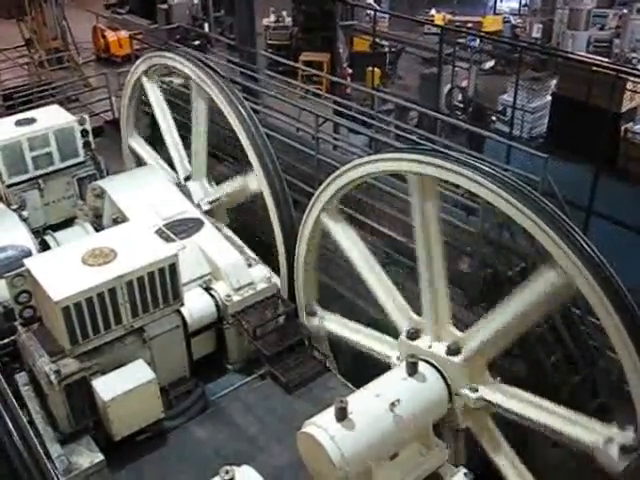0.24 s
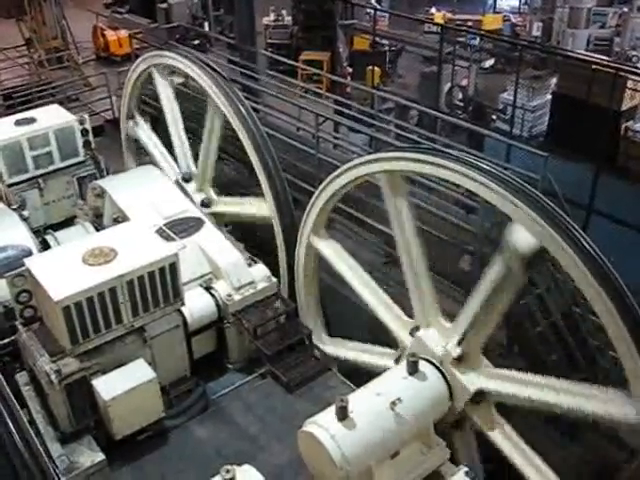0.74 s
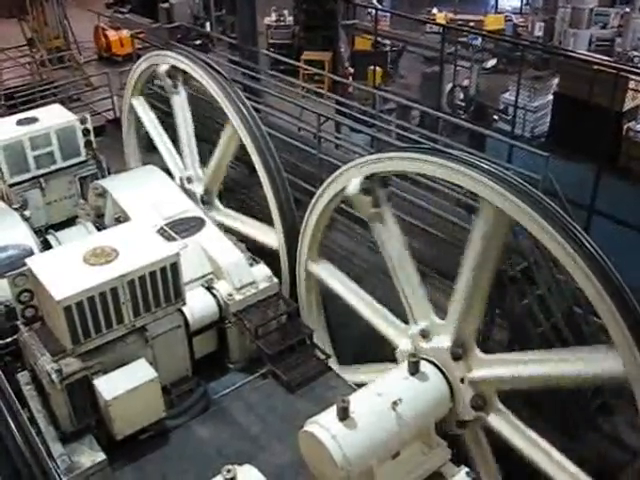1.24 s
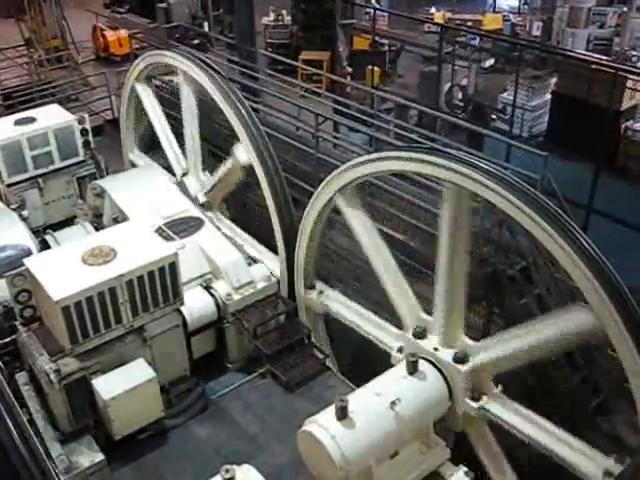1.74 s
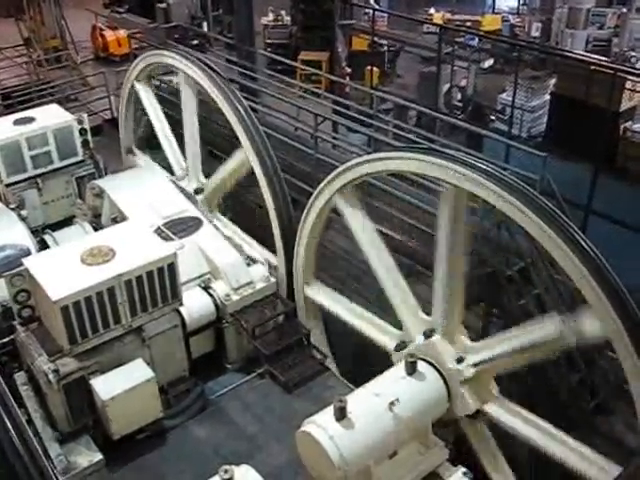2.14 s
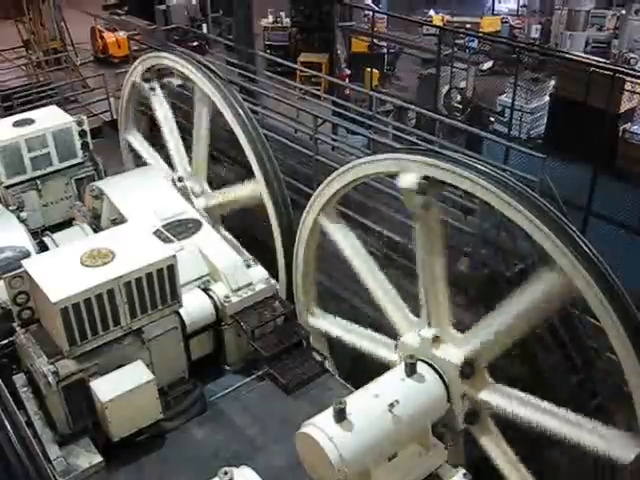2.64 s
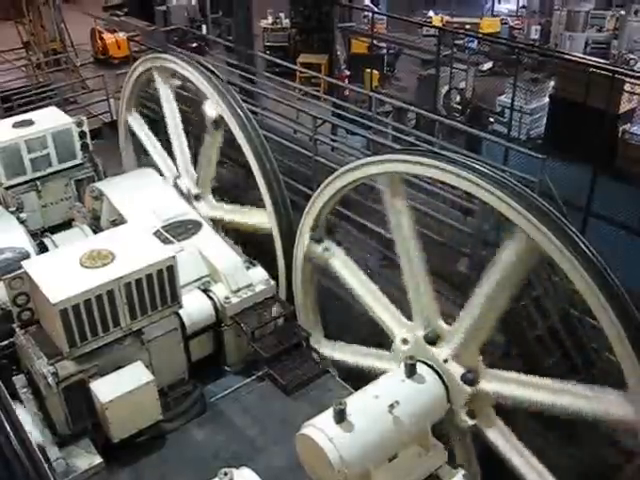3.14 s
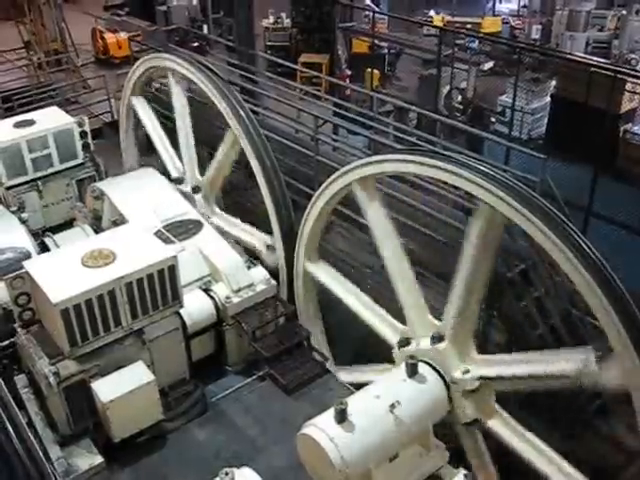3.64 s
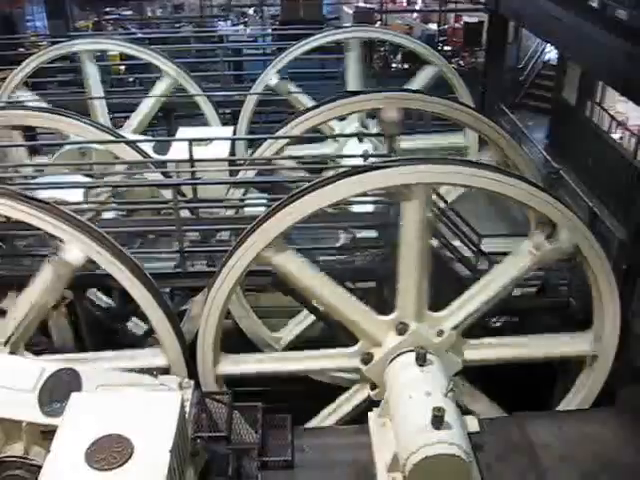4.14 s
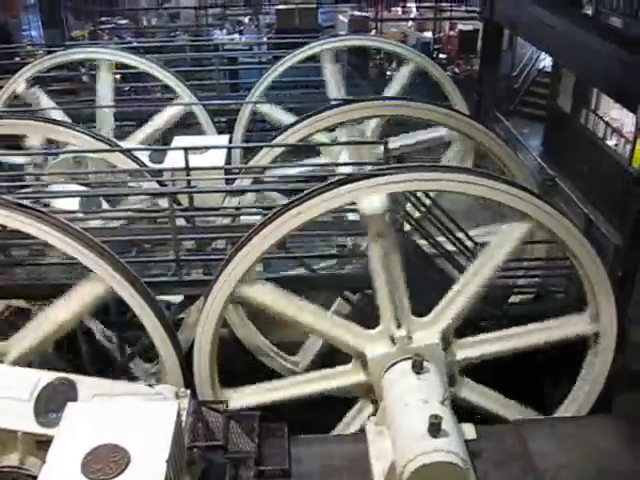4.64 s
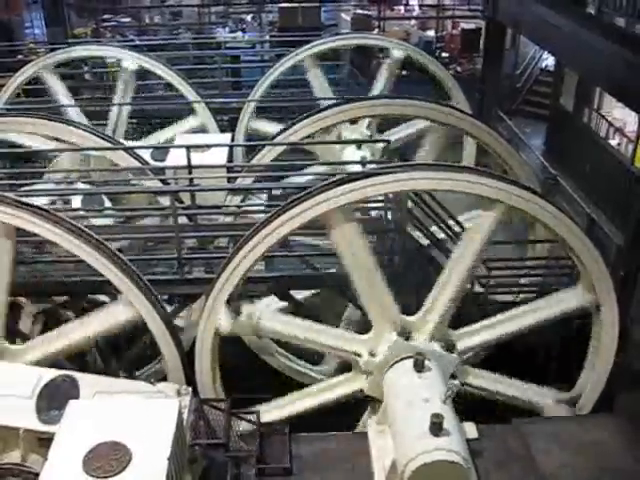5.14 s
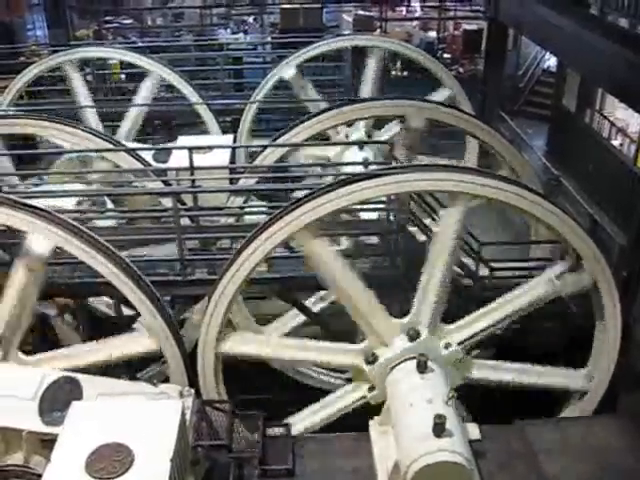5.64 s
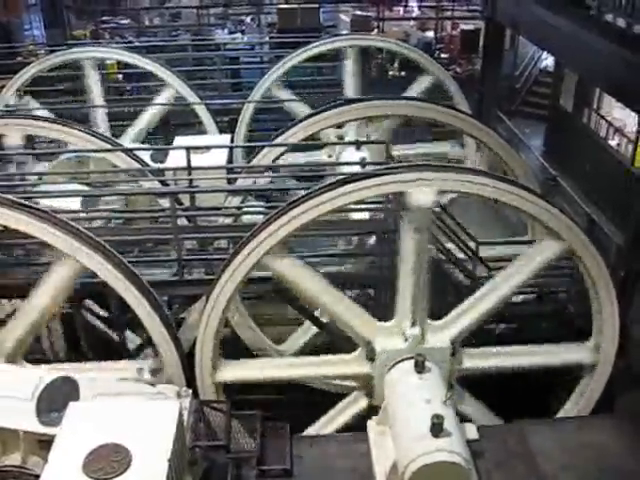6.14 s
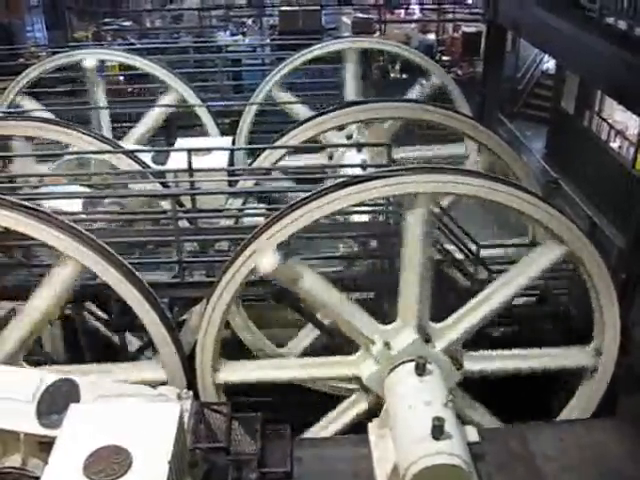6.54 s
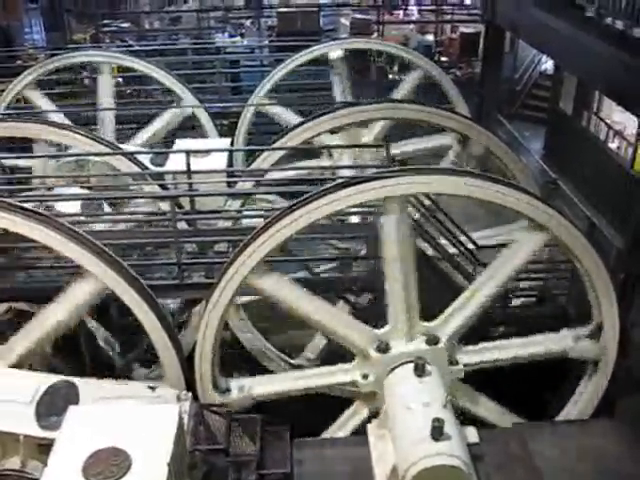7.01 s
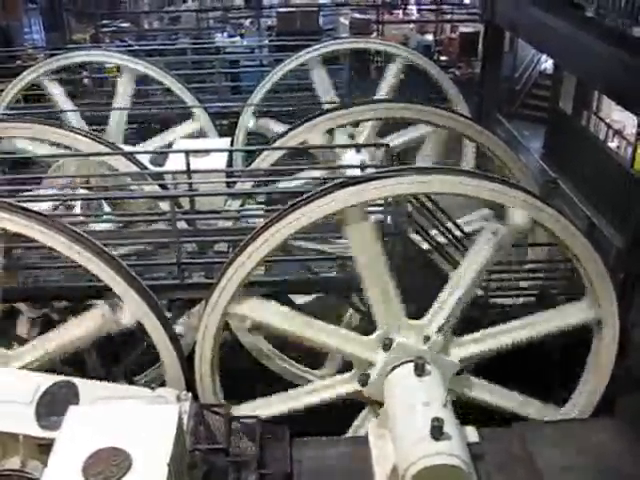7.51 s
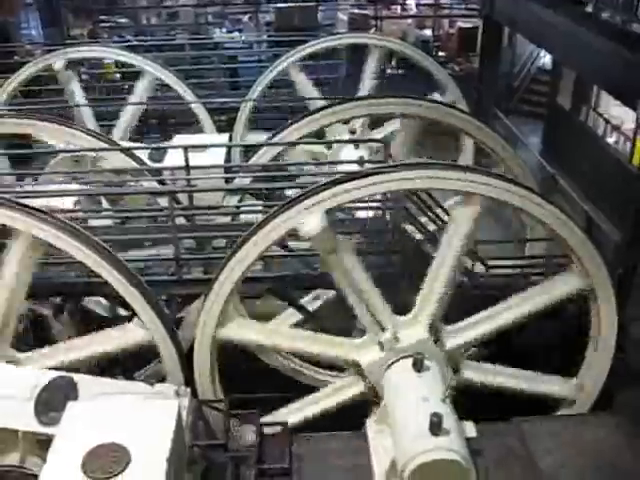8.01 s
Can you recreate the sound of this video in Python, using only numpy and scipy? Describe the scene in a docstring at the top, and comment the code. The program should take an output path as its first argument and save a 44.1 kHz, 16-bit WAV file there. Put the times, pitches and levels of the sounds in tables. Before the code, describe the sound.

From 0 to 4.1 s, loud steady machinery fills a hard hall: a gear whine around 450 to 490 Hz, made of close tones that beat, flutter and briefly dip, over a lower uneven drone near 227 Hz, motor hum near 360 and 720 Hz, and a dense low-mid roar. Cable rushes, ticks and scrapes in the grooves, with slight throbbing as spokes pass. Small steel knocks come near 0.4, 2.6 and 2.95 s; the drone swells near 2.95 s. At 4.1 s the sound stops dead, a faint hiss fading for about a tenth of a second. At 4.24 s it returns abruptly from another place, whine stronger, cable duller, with a strong short clack at 4.46 s. The whine keeps wavering, with quick dips near 5.15 and 6.2 s, and faint knocks near 5.7, 7.7 and 8.2 s. It ends still running, compressed and low-fidelity with thin glassy fizz.

```python
"""Cable powerhouse

Heard from two places on a gallery, with a short pause between them: the sound stops and a faint hiss fades away.
Gear tones whine and beat over a low drone and the motors' hum; cables rush, tick and scrape in a hard hall.
Steel knocks ring briefly, while ringing housings and a shaped noise roar fill the background.
A small camera evens the level and holds each sample at a low rate, which adds a thin glassy fizz.
"""
import sys
import numpy as np
from scipy import signal
from scipy.fft import rfft, irfft
from scipy.io import wavfile
from scipy.ndimage import uniform_filter1d

SR = 44100
rng = np.random.default_rng(int(sys.argv[2]) if len(sys.argv) > 2 else 0)


def transcribe(signal):
    """Save signal, clipped to [-1, 1], as a 16-bit WAV file at the path in sys.argv[1]."""
    frames = np.atleast_2d(signal).T
    limited = np.clip(frames, -1, 1)
    pcm = np.round(limited * 32767).astype(np.int16)
    wavfile.write(sys.argv[1], SR, pcm)


N = 364707
TIME = np.arange(N) / SR  # s
HZ = np.fft.rfftfreq(N, 1 / SR)
LEAVE_S, RESUME_S = 4.102, 4.238  # the pause between the two places
SPOKES, TURN_S = 8, 3.26  # spokes of a wheel, and the time of one turn
SPOKE_FIRST_S, SPOKE_SECOND_S = .12, 4.4  # a moment at each place when a spoke sweeps past
MIDDLE_HZ = 472.5  # parts the upper mesh tones from the lower
RIPPLE_HZ = 359.9  # rectifier ripple
HOLD = 4  # samples
EDGE_HZ = 15480


# Gear mesh of the drives, with side tones from the turning pinions:
# (pitch [Hz], nominal width [Hz], relative level at first place [dB], relative level at second place [dB])
MESH_TONES = [(450.5, 2.5, -30.5, -37.5), (459.3, 2, -31, -27.5), (470, 1.21, -23, -20),
              (477.5, 1.42, -28, -20.5), (482.6, 1.6, -42, -47), (488.7, 1.74, -31.5, -28),
              (505.5, 1.7, -41.5, -37)]
# Slow level of the whine under its load, before the trim: (time [s], level [dB])
WHINE_LOAD = [(0.0, -19.5), (1.15, -20.5), (1.4, -17.5), (2.0, -17.5), (2.2, -22), (4.1, -19.5), (4.3, -16),
              (5.05, -14.5), (6.3, -13.5), (7.3, -15), (8.27, -14)]
# Lead of the mesh tones above the middle pitch over those below it: (time [s], lead [dB])
UPPER_LEAD = [(0, -1), (1.2, 3.5), (1.7, -12), (2.2, 5), (3.1, -2), (4.1, 4), (4.4, 1), (4.8, -4),
              (5.8, 0.5), (6.4, -4.5), (7.3, -1.5), (7.7, 0.5), (8.27, 0.5)]
# Brief dips of the whine: (time [s], depth [dB], length [s])
WHINE_DIPS = [(.55, 5, 0.06), (.98, 11, 0.043), (2.12, 9, 0.049), (3.16, 7, 0.044), (3.5, 2, 0.045),
              (4.24, 3, 0.031), (4.48, 12, 0.024), (4.8, 5, 0.11), (5.15, 22, 0.026), (5.35, 5.5, 0.077),
              (5.69, 13.5, 0.074), (6.18, 15, 0.045), (6.37, 9, 0.08), (6.7, 7, 0.037), (7.16, 4.5, .07),
              (7.57, 6, 0.071), (7.99, 16, 0.058)]


def gears(flutter=.14, settle_s=0.048, level_db=-1.33,
          first_throb_db=3.5, second_throb_db=2.0, throb_width_hz=22):
    """Mesh tones of slightly different speeds beat; their sum follows the load, throbs unevenly and dips."""
    lead_db = np.interp(TIME, *np.transpose(UPPER_LEAD))
    whine = np.zeros(N, complex)
    for hz, width_hz, first_db, second_db in MESH_TONES:
        wander = drift(width_hz)
        steadied = wander / (abs(wander) + 0.12)  # mostly phase wander, little change of level
        envelope = steadied + flutter * drift(28)
        db = by_place(first_db, second_db) + np.sign(hz - MIDDLE_HZ) * lead_db / 2
        whine += gain_of(db) * envelope * np.exp(2j * np.pi * hz * TIME)
    load_db = np.interp(TIME, *np.transpose(WHINE_LOAD))
    throb_db = by_place(first_throb_db, second_throb_db) * drift(throb_width_hz).real
    return played(whine, load_db - bumps(WHINE_DIPS) + throb_db + level_db, settle_s)


# Strong swells of the low drone: (time [s], rise [dB], length [s])
LOW_SWELLS = [(.74, 4, 0.074), (2.61, 3, 0.088), (2.95, 11, 0.082), (4.26, 9, .07), (4.42, 8, 0.071),
              (5.88, 8.5, 0.12), (6.19, 8, 0.11), (6.56, 8, 0.07), (7.34, 9, 0.06)]


def drone(hz=227, width_hz=20, settle_s=0.084, first_db=-30.5, second_db=-33.5,
          uneven_db=4.0, uneven_width_hz=12):
    """A narrow band of tone swells unevenly, about an octave under the whine."""
    uneven = uneven_db * drift(uneven_width_hz).real
    level_db = by_place(first_db, second_db) + bumps(LOW_SWELLS) + uneven
    return played(drift(width_hz) * np.exp(2j * np.pi * hz * TIME), level_db, settle_s)


# Magnetic hum on multiples of the rectifier ripple:
# (multiple [-], level at first place [dB], level at second place [dB])
MOTOR_TONES = [(1, -32.5, -32.5), (2, -28.5, -35.5), (3, -45, -38.5), (4, -47, -47)]
# Slow swell of the hum's second multiple: (time [s], level change [dB])
SECOND_SWELL = [(0, 0), (1.1, 0.5), (1.8, -2.5), (3.4, -1.5), (4.1, -5), (5.5, 2.5), (6.3, -1), (7.3, 1.5),
                (8.27, -7)]


def motors(waver=0.46, first_spoke_db=0.5, second_spoke_db=1.0):
    """Magnetic hum of fixed pitch wavers at random; its second multiple also swells and throbs with the spokes."""
    throb_db = by_place(first_spoke_db, second_spoke_db) * spokes()
    swell = gain_of(np.interp(TIME, *np.transpose(SECOND_SWELL)) + throb_db)
    hum = np.zeros(N)
    for multiple, first_db, second_db in MOTOR_TONES:
        multiple = round(multiple)
        partial = tone(multiple * RIPPLE_HZ, evened(1 + waver * drift(12.0)))
        if multiple == 2:
            partial = partial * swell
        hum += gain_of(by_place(first_db, second_db)) * partial
    return hum


# Rush of cable in the wheel grooves, before the rub and hiss trims:
# (frequency [Hz], density at first place [dB per Hz], density at second place [dB per Hz])
CABLE_RUSH = [(400, -75.5, -66), (1165, -61.5, -63.5), (1560, -59.5, -63), (2170, -61, -63.5),
              (2980, -67, -68), (3480, -65.5, -64), (4400, -68.5, -70), (5540, -70, -70)]
# The cable scrapes harder for a moment: (time [s], rise [dB], length [s])
CABLE_SCRAPES = [(2.21, 4, 0.13), (2.63, 5, 0.058), (2.94, 1.5, .14), (3.86, 2, 0.078), (4.85, 2.5, 0.076),
                 (5.34, 5, 0.092), (6.21, 4, 0.043), (7.25, 3.5, 0.12), (8.04, 3.5, 0.06)]


def cable(strain_db, ticks_per_s=260, spread_db=3.5, tick_share=0.38, split_hz=2500,
          rub_depth=1.2, hiss_depth=1.0, hiss_scrape=0.18, rub_db=-0.37, hiss_db=-0.34):
    """Strands slide and tick in the grooves: a coarse rub below, a hiss above."""
    tick_gain = gain_of(spread_db * np.minimum(rng.exponential(1, N), 4))
    ticks = (rng.random(N) < ticks_per_s / SR) * tick_gain * rng.choice([-1, 1], N)
    ticks = hall(ticks, t60=0.61, wet_db=-5.5)
    rush = coloured(evened(rng.standard_normal(N) + tick_share * evened(ticks)), CABLE_RUSH)
    rub = signal.sosfiltfilt(signal.butter(2, split_hz, fs=SR, output="sos"), rush)
    hiss = rush - rub
    scrape_db = bumps(CABLE_SCRAPES)
    rub_gain = gain_of(rub_db + rub_depth * strain_db + scrape_db)
    hiss_gain = gain_of(hiss_db + hiss_depth * strain_db + hiss_scrape * scrape_db)
    return rub * rub_gain + hiss * hiss_gain


# How hard the cable rubs, used about its mean at each place: (time [s], level [dB])
CABLE_TREND = [(0.0, -25.5), (.4, -25.5), (1.85, -26.5), (2.5, -25.5), (4.1, -26), (4.3, -29),
               (5.05, -29.5), (6.3, -29), (8.27, -28)]


def strain(spoke_db=0.26, uneven_db=1.56, uneven_width_hz=14):
    """How hard the cable works, in dB: a slow trend, a throb at each spoke and some unevenness."""
    return swing(CABLE_TREND) + spoke_db * spokes() + uneven_db * drift(uneven_width_hz).real


def spokes():
    """Swings between -1 and 1, once for every spoke that sweeps past."""
    return np.cos(2 * np.pi * SPOKES / TURN_S * (TIME - by_place(SPOKE_FIRST_S, SPOKE_SECOND_S)))


# Knocks of the running gear: (time [s], onset level [dB], ring pitch [Hz], t60 [s])
STEEL_KNOCKS = [(.436, -32, 2400, .08), (2.616, -30, 2000, .1), (2.953, -31, 1800, .08),
                (4.459, -12, 1400, .026), (5.7255, -32, 2000, .06), (7.7025, -32, 2200, .06),
                (8.164, -33, 2200, .06)]


def knocks(width_hz=420):
    """Short clacks of steel: dying bands of noise, thrown back by the hall."""
    clacks = np.zeros(N)
    for s, db, hz, t60 in STEEL_KNOCKS:
        resonance = signal.iirpeak(hz, hz / width_hz, SR)
        ring = evened(signal.lfilter(*resonance, rng.standard_normal(N)))
        decay_db = db - 60 * np.maximum(TIME - s, 0) / t60
        clacks += (TIME >= s) * gain_of(decay_db) * ring
    return hall(clacks, t60=.8, wet_db=-17)


# Tones of shafts, fans and ringing housings:
# (pitch [Hz], width [Hz], level at first place [dB], level at second place [dB])
HOUSING_TONES = [(37.6, 1, -60, -70), (57, 1.1, -61, -47.5), (75.3, 1.3, -49, -48), (116.6, 4.3, -38, -42),
                 (151.2, 7.6, -52, -48.5), (168, 1.5, -47.5, -56), (272.7, 2.1, -40.5, -46),
                 (317, 1.5, -36.5, -56), (328, 3.8, -40, -40.5), (409.7, 2.7, -38.5, -39.5),
                 (434, 4.7, -35, -33.5), (546.5, 2.4, -36.5, -40), (818, 24, -50, -52),
                 (893, 6.6, -46, -47), (917, 16, -46, -37.5), (573, 3, -38, -43.7), (1043, 4, -43.3, -54),
                 (1092, 5, -39.5, -47), (4727, 16, -47.5, -55), (1412, 40, -39, -41.5),
                 (2034, 41, -43, -43), (2350, 30, -46, -46), (3370, 33, -49, -46), (4400, 35, -69, -50)]


def housings():
    """Narrow resonances kept ringing by the running machines, each drifting in level and phase."""
    return sum(gain_of(by_place(first_db, second_db)) * tone(hz, drift(width_hz))
               for hz, width_hz, first_db, second_db in HOUSING_TONES)


# Roar of the hall, before its trim:
# (frequency [Hz], density at first place [dB per Hz], density at second place [dB per Hz])
HALL_ROAR = [(21.7, -78, -82), (42, -70, -72), (60, -57, -62.5), (97, -58, -62.5), (120, -54, -54.5),
             (206, -51, -52.5), (392, -49, -51.5), (610, -52, -54), (750, -50, -52.5), (952, -55, -55.5),
             (1170, -67.5, -67.5), (2520, -78.5, -68.5), (5400, -72.5, -86)]


def roar(strain_db, follow=0.59, scrape_share=.2, lumpy_db=1.1, lump_width_hz=14, level_db=-0.07):
    """The blended noise of all the machines; it heaves a little with the cable."""
    cable_db = follow * strain_db + scrape_share * bumps(CABLE_SCRAPES)
    heave_db = cable_db + lumpy_db * drift(lump_width_hz).real
    return coloured(rng.standard_normal(N), HALL_ROAR) * gain_of(heave_db + level_db)


def hall(x, t60, wet_db):
    """Direct sound and a dense, dying tail from the walls."""
    t = TIME[:SR]
    tail = rng.standard_normal(SR) * gain_of(-60 * t / t60)
    return x + gain_of(wet_db) * signal.fftconvolve(x, tail / np.linalg.norm(tail))[:N]


def pause(x, hiss_db=-46, hiss_s=0.055, return_s=0.0066):
    """The sound stops dead; a faint hiss fades into the silence before the machines come back."""
    running = (TIME < LEAVE_S) + np.clip((TIME - RESUME_S) / return_s, 0, 1)
    fading = (TIME >= LEAVE_S) * np.clip(1 - (TIME - LEAVE_S) / hiss_s, 0, 1) ** .5
    hiss = evened(signal.lfilter([1], [1, -.8], rng.standard_normal(N)))
    return x * running + hiss * fading * gain_of(hiss_db)


def levelled(x, threshold_db=-17, squeeze=.42, follow_s=.035, ceiling=.48):
    """Gain control turns everything down while the sound is loud; the highest peaks are rounded off."""
    keep = np.exp(-1 / (follow_s * SR))
    power_db = 10 * np.log10(signal.lfilter([1 - keep], [1, -keep], x ** 2) + 1e-9)
    x = x * gain_of(-squeeze * np.maximum(power_db - threshold_db, 0))
    return x / (1 + (x / ceiling) ** 8) ** (1 / 8)


def gain_of(db):
    """Decibels to amplitude."""
    return 10 ** (np.asarray(db) / 20)


def evened(x):
    """Scales to rms 1."""
    return x / np.sqrt(np.mean(abs(x) ** 2) + 1e-20)


def by_place(first, second):
    """The first value until the sound resumes, the second from then on."""
    return np.where(TIME < RESUME_S, first, second)


def swing(table):
    """A level curve, in dB about its mean at each place."""
    db = np.interp(TIME, *np.transpose(table))
    return db - by_place(db[TIME < LEAVE_S].mean(), db[TIME > RESUME_S].mean())


def bumps(events):
    """A smooth rise and fall in dB for each event; its length is taken at half height."""
    return sum(db * .5 ** np.minimum((2 * (TIME - s) / length) ** 2, 20) for s, db, length in events)


def drift(width_hz):
    """Slow complex random motion of rms 1 that fills a band of the given width."""
    size, step = 8192, 64  # coarse points, and samples between them
    hz = np.fft.fftfreq(size, step / SR)
    phases = np.exp(2j * np.pi * rng.random(size))
    coarse = np.fft.ifft(phases / (1 + (2 * hz / width_hz) ** 4) ** .5)
    return evened(np.interp(np.arange(N) / step, np.arange(size), coarse))


def tone(hz, envelope):
    """A sine that carries a complex envelope, with the same rms."""
    return np.sqrt(2) * (envelope * np.exp(2j * np.pi * hz * TIME)).real


def played(carrier, level_db, settle_s):
    """Keeps only the fast beats of a complex carrier and gives it a level."""
    power = uniform_filter1d(abs(carrier) ** 2, int(settle_s * SR))
    return np.sqrt(2) * carrier.real / np.sqrt(abs(power) + 1e-12) * gain_of(level_db)


def coloured(x, table):
    """Gives a white sound of rms 1 the spectrum heard at each place."""
    hz, *places = np.transpose(table)
    # the scale turns rms 1 into density per Hz; the bass falls away below the first frequency
    spectrum = rfft(x) * np.sqrt(SR / 2) * np.minimum(HZ / hz[0], 1)
    heard = [irfft(spectrum * gain_of(np.interp(np.log(HZ + 1), np.log(hz), db)), N) for db in places]
    return by_place(*heard)


def scene(level_db=-0.26):
    """All the machinery at once, with one strain shared by cable and roar."""
    strain_db = strain()
    machines = gears() + drone() + motors() + housings()
    machines = machines + cable(strain_db) + knocks() + roar(strain_db)
    return gain_of(level_db) * machines[None]


def record(dry):
    """The pause, gain control, a low sample rate with each sample held, and the band limit."""
    narrow = signal.oaconvolve(pause(dry[0]), signal.firwin(201, 5600, fs=SR), "same")
    held = np.repeat(levelled(narrow)[::HOLD], HOLD)[:N]  # the steps mirror the whine into the treble
    edge = signal.firwin(1023, EDGE_HZ, window=("kaiser", 9), fs=SR)
    return signal.oaconvolve(held, edge, "same")[None]


dry = scene()
out = record(dry)
transcribe(out)
```